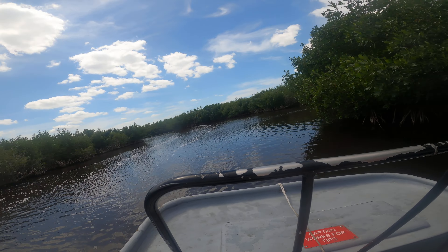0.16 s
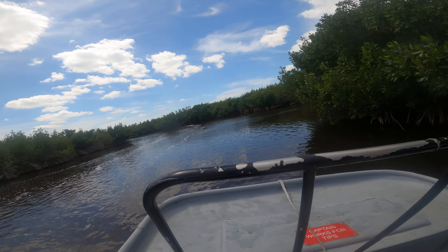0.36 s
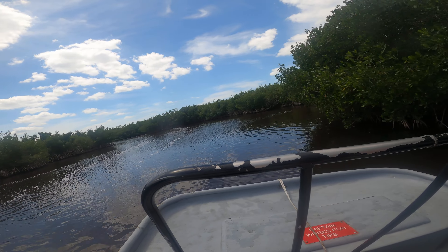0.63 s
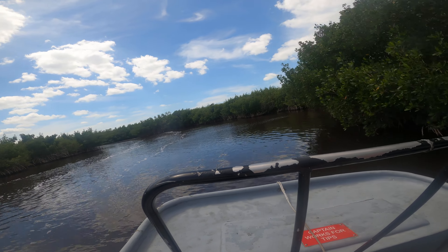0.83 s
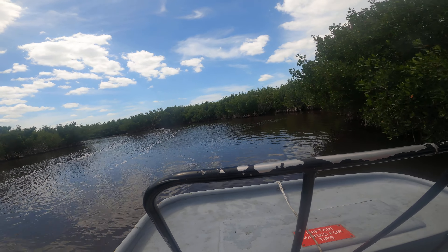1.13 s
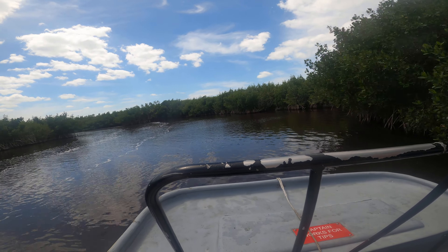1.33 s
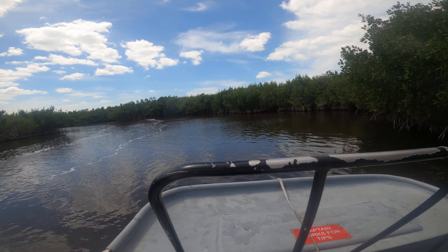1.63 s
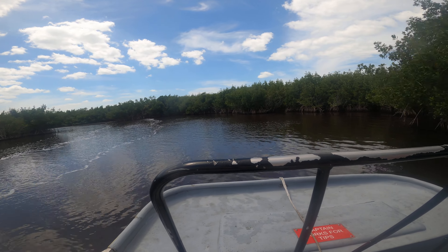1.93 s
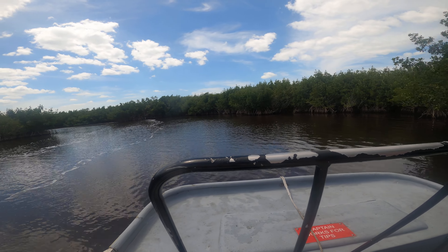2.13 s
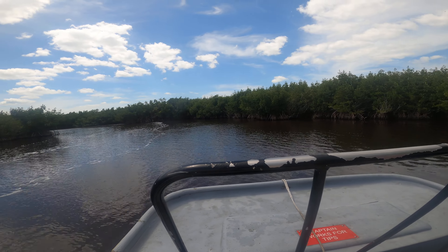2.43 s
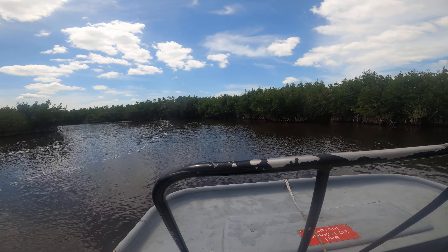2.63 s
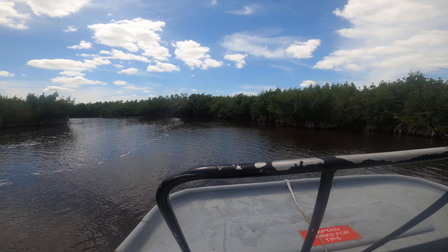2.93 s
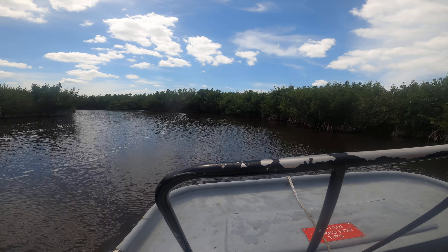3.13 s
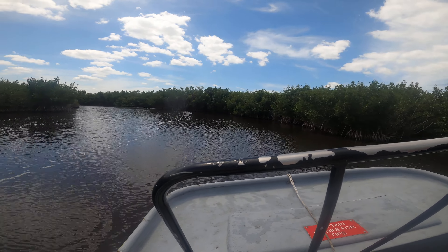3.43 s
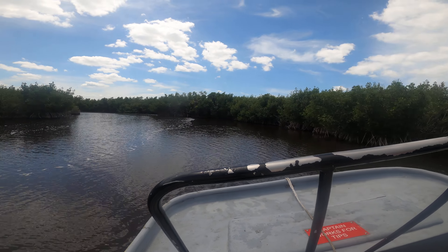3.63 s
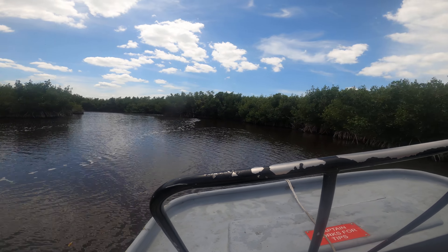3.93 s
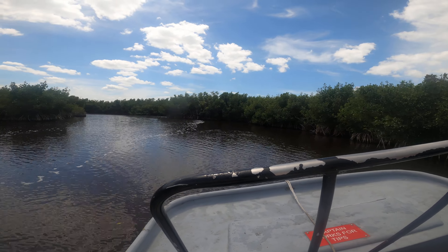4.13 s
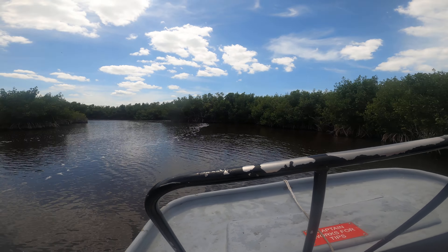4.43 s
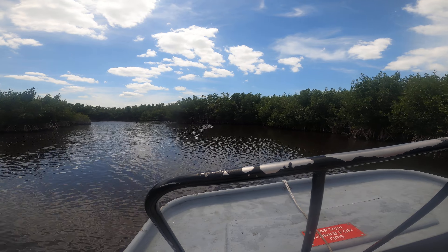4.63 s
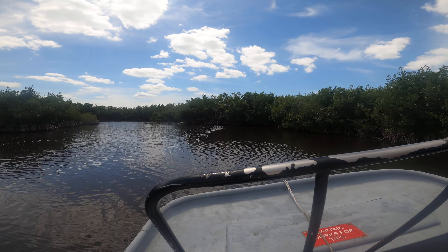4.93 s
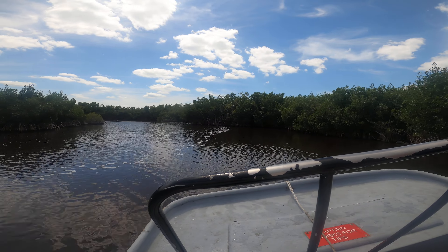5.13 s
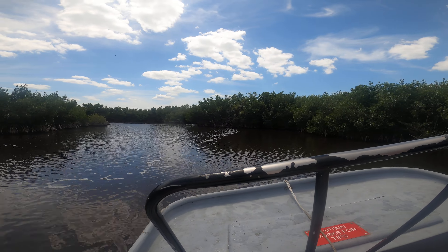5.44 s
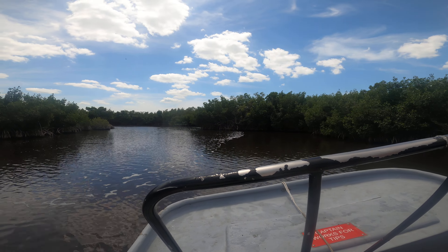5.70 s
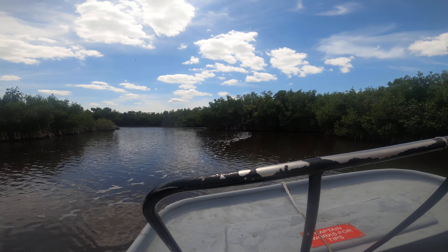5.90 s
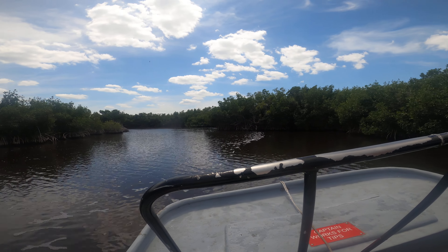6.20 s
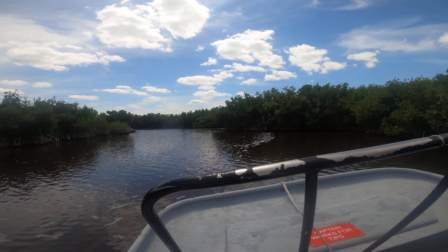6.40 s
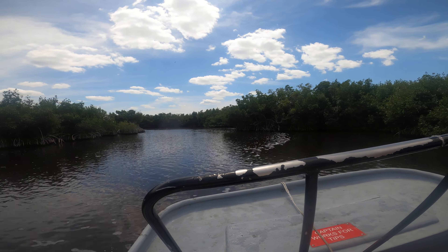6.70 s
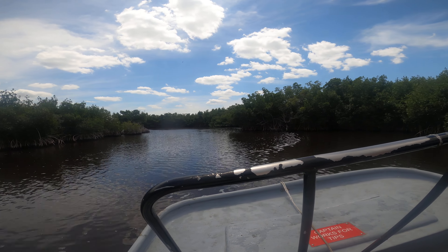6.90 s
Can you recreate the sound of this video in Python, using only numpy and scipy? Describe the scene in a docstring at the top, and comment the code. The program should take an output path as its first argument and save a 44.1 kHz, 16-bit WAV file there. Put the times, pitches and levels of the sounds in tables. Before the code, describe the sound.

An airboat under way, heard close in stereo from the bow, outdoors and dry. From 0 to 3 s the large engine and two-blade propeller cruise at full roar: a low, nearly steady drone edging slightly upward, a ragged buzz that swells and fades, uneven exhaust beats and dense throbbing air. Around 3.1 s the throttle is chopped; pitch and loudness tumble, the buzz vanishes, and by 4.1 s only a slow, deep chugging flutter remains, about a third of the cruising speed. From 4.1 to 4.75 s it revs up, with thin whistles climbing and hollow thumps of the hull at each blade pass. It sags back to a low chug by 5.35 s, then opens again with more whistles, reaching a firm growl by 6 s. It holds, thumping and roughly pulsing, and whistles rise again near 6.8 s as it strengthens slightly to the end at 7 s.

```python
"""An airboat under way, heard from the bow: a V8 drives a two-blade propeller at half crank speed.
It first cruises with steady blade tones, a ragged buzz, uneven exhaust beats and roaring, throbbing air.
At 3 s the throttle is chopped and the pitch falls; then it is blipped, eased and opened again.
At these low speeds each blade pass thumps the hull, and thin whistles climb as the throttle opens.
The tones are sums of sine waves locked to the shaft; the air is filtered noise. Two microphone ports hear it."""
import sys
import numpy as np
from scipy import signal
from scipy.fft import rfft, irfft, next_fast_len
from scipy.io import wavfile
from scipy.ndimage import uniform_filter1d

SR = 44100
rng = np.random.default_rng(int(sys.argv[2]) if len(sys.argv) > 2 else 0)


def inscribe(sig):
    """Save sig as 16-bit PCM at rate SR to the path in sys.argv[1].

    A 1-D sig is mono; a 2-D sig holds one channel per row.
    Samples are clipped to [-1, 1] before scaling.
    """
    pcm = np.round(np.clip(np.atleast_2d(sig).T, -1, 1) * 32767)
    wavfile.write(sys.argv[1], SR, pcm.astype(np.int16))


N = 311327
LONG = next_fast_len(N + SR // 4)   # samples in each spectrum, with spare room at the end
STEP = 8   # engine tones lie low, so they are built on every 8th sample
CRUISE_HZ = 41.2   # shaft turns per second at cruise


def amp(db):
    """Turn decibels into a gain."""
    return 10 ** (np.asarray(db) / 20)


def in_time(rows):
    """Read the columns of a table at every sample."""
    start_s, *columns = np.transpose(rows)
    return [np.interp(np.arange(N) / SR, start_s, column) for column in columns]


def at_hz(points, hz):
    """Read a spectrum on a log-frequency axis."""
    points = np.array(points, float)
    return np.interp(np.log(hz + 1), np.log(points[:, 0] + 1), points[:, 1])


def drift(rate_hz, count=N):
    """Slow random wandering of spread 1 over the whole scene, made on every 64th sample."""
    pole = np.exp(-2 * np.pi * rate_hz * 64 / SR)
    noise = rng.standard_normal(N // 64 + 1500)
    slow = signal.lfilter([1], [1, -2 * pole, pole ** 2], noise)[1500:]
    places = np.linspace(0, len(slow) - 1, count)
    return np.interp(places, np.arange(len(slow)), slow / slow.std())


def tone(level_db, turn, order, flutter_db, wander_rad, rate_hz, lag=0):
    """One order (whole number of waves per shaft turn); turbulence shakes its level and phase."""
    count = len(turn)
    gain = np.sqrt(2) * amp(level_db + flutter_db * drift(rate_hz, count))
    return -gain * np.sin(order * turn - lag + wander_rad * drift(rate_hz, count))


# how fast the blades go by: start_s, blade_hz (passes per second)
BLADE_SPEED = [(0, 80.6), (.2, 81.4), (.44, 81.9), (1.2, 82.35), (2.3, 82.65), (2.95, 82.0), (3.08, 79),
               (3.19, 65.8), (3.31, 57.4), (3.52, 45.17), (3.84, 33.7), (4.09, 28), (4.3, 37.4),
               (4.5, 43.9), (4.73, 47.8), (4.79, 47.4), (5.02, 37.3), (5.33, 28.45), (5.42, 29.4),
               (5.78, 40.4), (6.03, 44.4), (6.42, 46.4), (6.88, 47.1), (7.06, 50)]
# how hard the engine pulls: start_s, effort_db (against full effort)
ENGINE_EFFORT = [(0, 2.5), (1.0, 2), (2.85, 1.5), (3.08, -1), (3.18, -7), (3.3, -10), (3.5, -15.5),
                 (3.92, -22.5), (4.15, -17), (4.4, -7), (4.72, -2), (5.0, -9), (5.33, -15.5), (5.45, -11),
                 (5.6, -6), (5.75, -3.5), (6.0, -3), (6.3, -3.5), (6.9, -1.5), (7.06, -1)]
# engine tones, throttle open: blade_hz, then level_db at full effort, before unsteadiness,
# of blade tones 1, 2, 3 and of exhaust orders 3, 5, 8, 10, 11
OPEN_THROTTLE = [(28.6, -9, -32, -25, -15, -29, -23, -26, -31.5),
                 (32, -14, -22, -37, -29, -38.0, -19.5, -25.5, -41),
                 (37, -15, -33, -26, -16.5, -39, -22, -29, -14),
                 (39.5, -10.5, -32.5, -23.5, -35, -25, -17.5, -29, -32.5),
                 (42.3, -11.5, -24, -35, -36, -24.0, -21, -25, -24.5),
                 (44.2, -18, -23, -33, -37, -22, -26, -41, -24.5),
                 (44.6, -12, -22, -33, -38, -21.5, -22, -40, -25.5),
                 (47.1, -20, -21.5, -28, -45, -20, -23.5, -26, -38),
                 (47, -19, -24, -23, -47, -21.5, -19.5, -31.5, -42),
                 (51, -30, -19.5, -40, -40.5, -18, -23.5, -21, -30.5),
                 (82.4, -14.0, -18.5, -20.0, -38.0, -36.5, -32.5, -38, -58.5)]
# the same columns with the throttle shut
SHUT_THROTTLE = [(28.7, -15, -24, -23.5, -17, -28, -28, -31, -40),
                 (32, -11.5, -24, -24, -20.5, -34, -32, -36, -23),
                 (35, -7, -24, -27, -37, -42, -46, -21.5, -22),
                 (39.7, -11.0, -29.0, -24, -24, -30, -30.5, -27, -52),
                 (46.4, -13.0, -20, -22, -41, -22.5, -30, -33, -35),
                 (45.8, -24, -20, -35, -29.0, -19.5, -27.5, -36, -36.5),
                 (51, -15.5, -18, -46, -32, -22, -26, -33, -35),
                 (58.8, -8, -27, -17.5, -39.5, -45, -29, -39.5, -39),
                 (65.7, -10, -20, -24.5, -34, -40, -28, -30.5, -49),
                 (72.4, -11, -44, -20, -36, -50.5, -34, -31.5, -64),
                 (79.7, -13, -18.5, -20, -39.0, -32, -30.5, -44, -56.0)]
# for each of those eight tones: dB lost per dB of lost effort
TONE_FOLLOWS_EFFORT = [0.78, 0.29, .6, 0.57, 0.57, 0.82, 0.88, 1]


def controls():
    """Blade speed and engine effort set the levels of the engine tones and the moving air."""
    (blade_hz,), (effort_db,) = in_time(BLADE_SPEED), in_time(ENGINE_EFFORT)
    slack_db = np.minimum(effort_db, 0)
    # the throttle counts as fully shut when the blade rate falls by 16 Hz per second or faster
    fall_hz_per_s = -np.gradient(blade_hz) * SR
    shut = uniform_filter1d(np.clip(fall_hz_per_s / 16, 0, 1), size=2000)
    cruising = np.clip((blade_hz / 2 / CRUISE_HZ - .9) / 0.028, 0, 1)
    open_hz, *open_levels = np.transpose(OPEN_THROTTLE)
    shut_hz, *shut_levels = np.transpose(SHUT_THROTTLE)
    tone_db = []
    for open_db, shut_db, share in zip(open_levels, shut_levels, TONE_FOLLOWS_EFFORT):
        pull_db = (1 - shut) * np.interp(blade_hz, open_hz, open_db)
        coast_db = shut * np.interp(blade_hz, shut_hz, shut_db)
        # the tones grow less steady as effort is lost
        tone_db.append(pull_db + coast_db + slack_db * (share + 0.07 * drift(8.4)))
    # each level: dB at full effort, dB per dB of effort, then changes at cruise or with throttle shut
    upper_db = -39.5 + 0.8 * effort_db - 3 * cruising - 1.5 * shut
    rumble_db = -31 + 0.096 * effort_db - 27 * cruising
    growl_db = -28.5 + 0.79 * effort_db - 5 * cruising
    roar_db = -27 + 0.93 * effort_db - 3.5 * cruising
    hiss_db = -34.5 + 0.79 * effort_db
    return blade_hz / 2, tone_db, upper_db, (rumble_db, growl_db, roar_db, hiss_db)


# blade buzz: order (waves per shaft turn), level_db (before speed, swell and flutter)
BLADE_BUZZ = [(9, -30.5), (10, -21.5), (11, -41.5), (12, -14), (13, -36.5), (14, -18.5), (15, -38.5),
              (16, -16), (17, -43.5), (18, -25.5), (19, -25), (20, -19.5), (21, -36.5), (22, -20.5),
              (23, -34), (24, -26.5), (25, -24), (26, -19.5), (27, -24.5), (28, -16), (29, -30.5),
              (30, -21), (32, -33), (34, -29), (36, -35.5), (38, -26), (40, -27.5), (48, -34.5)]
# the buzz swells and fades: start_s, low_part_db, high_part_db
BUZZ_SWELLS = [(0, -1, 4), (.55, -13.5, 5), (.68, 5, 3.5), (.95, 3, -3), (1.07, -8, 1), (1.25, 2.5, -1.5),
               (1.5, -4, 2), (1.65, 3, -0.5), (1.9, -9, 2), (2.12, 0.5, 0), (2.25, 4.5, 0),
               (2.45, -20, -0.5), (2.65, 6.5, 0.5), (2.85, 3.5, -1), (3.0, -1, 3)]


def propeller(turn, shaft_hz, low_db):
    """Each blade pass is a slow rise and a sharp drop; the ragged buzz above dies fast as tip speed falls."""
    # two paths cancel the lowest blade tone at 47.5 Hz; below that it arrives inverted
    first_lag = np.arctan((2 * shaft_hz - 47.5) / 2.0) - np.pi / 2
    out = 0
    for order, level_db, lag in zip((2, 4, 6), low_db, (first_lag, 0, 0)):
        out += tone(level_db, turn, order, flutter_db=.5, wander_rad=.04, rate_hz=9.5, lag=lag)
    tip_db = -19 + 170 * np.log10(shaft_hz / CRUISE_HZ)
    low_part_db, high_part_db = [column[::STEP] for column in in_time(BUZZ_SWELLS)]
    for order, db in BLADE_BUZZ:
        cruise_pitch_hz = order * CRUISE_HZ
        level_db = tip_db + db
        if cruise_pitch_hz > 1000:
            level_db = level_db + high_part_db
        if cruise_pitch_hz < 550:
            level_db = level_db + low_part_db
        lag = rng.uniform(0, 2 * np.pi)
        out += tone(level_db, turn, order, flutter_db=4.2, wander_rad=.55, rate_hz=4.0, lag=lag)
    return out


# tone colour of the weaker exhaust orders: pitch_hz, level_db (relative)
EXHAUST_COLOUR = [(15, -4.5), (25, -7), (40, 1), (130, 5), (195, 10.5), (232, 9.5), (258, 5.5), (290, -1.5),
                  (400, -6), (600, -11.5)]
# weaker exhaust orders: order (waves per shaft turn), level_db (relative)
WEAKER_EXHAUST = [(1, -5), (7, -8.5), (9, -21.5), (12, -20.5), (13, 3.5), (14, -19), (15, -8.5), (16, 2.5),
                  (17, -7.5), (18, -10.5), (19, 0.5), (20, -14), (21, 3.5)]


def exhaust(turn, shaft_hz, low_db, upper_db):
    """Eight firings per shaft turn; the near bank fires unevenly, which feeds orders 3 and 5 of every 8."""
    near_bank = np.array([1, 0, 0, 1, 0, 1, 1, 0])
    far_share = .2   # loudness of the farther cylinder bank against the near one
    lags = np.angle(np.fft.fft(near_bank + far_share * (1 - near_bank)))
    late = turn - 1.42   # the beats arrive behind the blades (radians of shaft)
    out = 0
    for order, level_db in zip((3, 5, 8, 10, 11), low_db):
        out += tone(level_db, late, order, flutter_db=1.5, wander_rad=0.078, rate_hz=5.5, lag=lags[order % 8])
    for order, db in WEAKER_EXHAUST:
        level_db = upper_db + db + at_hz(EXHAUST_COLOUR, order * shaft_hz)
        if order in (12, 14):
            # blade passes strengthen these by up to 13 dB below cruise speed
            level_db = level_db + 13 * np.clip(2 - 2 * shaft_hz / CRUISE_HZ, 0, 1)
        out += tone(level_db, late, order, flutter_db=2.5, wander_rad=0.25, rate_hz=4.0, lag=lags[order % 8])
    return out


# colour of the moving air: pitch_hz, level_db (per Hz, relative within each range)
AIR_COLOUR = [(15, -8.5), (40, 3.5), (120, 3.5), (250, -4.5), (330, -11), (500, -3.5), (900, -11),
              (1000, -18), (1300, -12.5), (1700, -15.5), (3500, -25), (6500, -32), (8000, -41),
              (11000, -56), (16000, -72)]
# ringing of the microphone housing, added to the air: pitch_hz, width_hz, boost_db
HOUSING_RINGS = [(647, 130, -1), (1131.5, 217, 16.5), (2000, 91, 6), (3240, 280, 3.5), (4630, 160, 3)]
# noise common to both ports: pitch_hz, share (0 to 1)
SHARED_NOISE = [(50, 1), (300, 0.94), (600, 0.89), (1200, 0.87), (2000, 0.58), (4000, 0.55), (8000, 0.098),
                (12000, 0.76)]
# the air pulses with the blades: pitch_hz, once_per_pass_db, twice_per_pass_db (before patchiness scaling)
BLADE_THROB = [(100, .6, 0), (600, 2.2, .6), (1150, 1.4, 2.2), (1800, 1.1, 1.2), (3000, .5, .5),
               (5000, .2, .2)]


def wash(turn, rumble_db, growl_db, roar_db, hiss_db):
    """Turbulent air off the blades: four ranges on their own levels, patchy by band, throbbing with the passes."""
    hz = np.fft.rfftfreq(LONG, 1 / SR)
    colour_db = at_hz(AIR_COLOUR, hz)
    for ring_hz, width_hz, boost_db in HOUSING_RINGS:
        colour_db = colour_db + boost_db / (1 + (2 * (hz - ring_hz) / width_hz) ** 2)
    shared = np.clip(at_hz(SHARED_NOISE, hz), 0, 1)
    common, left, right = rfft(rng.standard_normal((3, LONG)))
    separate = np.array([left, right])
    noise = amp(colour_db) * (np.sqrt(shared) * common + np.sqrt(1 - shared) * separate)
    gust = drift(5.7)
    # the swells come at set phases around each pass (radians)
    once, twice = np.cos(2 * turn - 0.8), np.cos(4 * turn + 1.3)
    throb_hz, once_db, twice_db = np.transpose(BLADE_THROB)
    # low_hz, high_hz, number of bands, level_db, patchy_db
    ranges = [(15, 230, 3, rumble_db, 1.3), (230, 720, 4, growl_db, 1.9),
              (720, 1500, 3, roar_db, 0.8), (1500, 17000, 5, hiss_db, 0.48)]
    out = 0
    for low_hz, high_hz, count, level_db, patchy_db in ranges:
        edges = np.geomspace(low_hz, high_hz, count + 1)
        bands = 0
        for bottom, top in zip(edges, edges[1:]):
            patches_db = patchy_db * (0.073 * gust + drift(9.7))
            throb_db = np.interp(bottom, throb_hz, once_db) * once + np.interp(bottom, throb_hz, twice_db) * twice
            band = irfft(noise * ((hz >= bottom) & (hz < top)), LONG)[:, :N]
            bands = bands + amp(patches_db + throb_db) * band
        out = out + amp(level_db) * bands / bands.std()
    return out


# strength of the hull thump: start_s, level_db (a tone at the resonance sits 11 dB lower, before flutter)
HULL_THUMP = [(3.0, -64), (3.15, -28), (3.42, -34), (3.6, -48), (4.1, -53), (4.36, -37), (4.47, -31),
              (4.52, -22), (4.7, -21.5), (4.75, -33), (4.84, -26), (4.97, -28), (5.03, -40), (5.4, -45),
              (5.8, -33), (6.27, -32), (6.34, -24), (6.8, -24.5), (6.9, -28), (7.0, -25)]


def thump(turn, shaft_hz):
    """Each pressure pulse sets the hull panel ringing: even orders in step under one resonance."""
    panel_hz, panel_width_hz = 585, 210
    level_db = in_time(HULL_THUMP)[0][::STEP]
    shaken = turn + 0.0045 * drift(2.5, len(turn))
    out = 0
    for order in range(10, 46, 2):
        detune = 2 * (order * shaft_hz - panel_hz) / panel_width_hz
        ring_db = level_db - 11.0 - 20 * np.log10(1 + detune ** 2)
        lag = 2 * np.arctan(detune)   # lets the panel ring on after the blow
        out += tone(ring_db, shaken, order, flutter_db=1.2, wander_rad=.13, rate_hz=8.0, lag=lag)
    return out


# whistles as the throttle opens: start_s, end_s, start_pitch_hz, end_pitch_hz, level_db
# (pitches before wavering, level before flutter and the fades at both ends)
RISING_WHISTLES = [(4.1, 4.16, 1830, 1880, -51), (4.12, 4.45, 1950, 2050, -49),
                   (4.13, 4.3, 1660, 1830, -49), (4.3, 4.6, 2120, 2520, -49), (5.38, 5.63, 1600, 1810, -47),
                   (5.45, 5.73, 1780, 2110, -46), (5.49, 5.66, 1960, 2050, -47),
                   (5.57, 5.78, 2780, 2900, -49), (5.59, 5.77, 2270, 2630, -45),
                   (5.59, 5.67, 2530, 2760, -49), (5.64, 5.74, 2180, 2300, -47),
                   (6.77, 6.86, 2740, 2830, -51), (6.78, 6.92, 2480, 2770, -45),
                   (6.82, 6.97, 2320, 2530, -44), (5.6, 5.8, 1750, 1950, -47),
                   (6.95, 7.05, 2650, 2800, -53)]


def whistles():
    """Thin wavering tones that climb quickly, then level off."""
    out = np.zeros(N)
    for start_s, end_s, start_hz, end_hz, level_db in RISING_WHISTLES:
        span = slice(round(start_s * SR), round(end_s * SR))
        way = np.linspace(0, 1, span.stop - span.start)
        climb = 1 - (1 - way) ** 1.4
        hz = start_hz + (end_hz - start_hz) * climb + 14 * drift(35.0)[span]
        gain = np.sqrt(2) * amp(level_db + 2 * drift(35.0)[span])
        swell = np.sin(np.pi * way) ** .5
        out[span] += gain * swell * np.sin(2 * np.pi * np.cumsum(hz) / SR)
    return out


def engine(turn, shaft_hz, tone_db, upper_db):
    """All tones tied to the shaft, built at a low sample rate and then brought up to the full one."""
    turn, shaft_hz, upper_db = turn[::STEP], shaft_hz[::STEP], upper_db[::STEP]
    tone_db = [level[::STEP] for level in tone_db]
    tones = propeller(turn, shaft_hz, tone_db[:3])
    tones = tones + exhaust(turn, shaft_hz, tone_db[3:], upper_db)
    tones = tones + thump(turn, shaft_hz)
    return signal.resample_poly(tones, STEP, 1, window=("kaiser", 12))[:N]


# balance of the bass, which leans left after the chop: start_s, left_minus_right_db
BASS_LEAN = [(3.0, -1.0), (3.3, 1.5)]
# balance above the bass: pitch_hz, left_minus_right_db
PORT_BALANCE = [(300, -3.5), (530, 2), (810, 5), (1250, 6.5), (1940, 2), (2990, 9), (4620, 0), (7130, -3),
                (9000, 4), (12000, -4)]
# how far left leads right, before fading in the bass and top: pitch_hz, lead_rad (first row is not used)
PORT_LEAD = [(0, 0), (860, 0.3), (1380, -0.2), (1890, -1.6), (2670, -1.4), (3360, -0.6), (3620, -1.7),
             (4650, 0.4), (5000, -0.1), (5250, 0.2), (5860, -1.1), (6290, 1.9), (6720, 2.0), (7320, 3.4)]


def two_ports(air):
    """The two ports sit apart in the housing: each hears its own colour and lag."""
    hz = np.fft.rfftfreq(LONG, 1 / SR)
    side = np.array([[.5], [-.5]])   # left, right
    bass = 1 / (1 + (hz / 450) ** 2)
    lead_rad = at_hz(PORT_LEAD[1:], hz) * (1 - bass) / (1 + (hz / 9000) ** 8)
    ports = rfft(air, LONG) * np.exp(1j * side * lead_rad)
    low = irfft(ports * bass, LONG)[:, :N]
    treble = irfft(ports * (1 - bass) * amp(side * at_hz(PORT_BALANCE, hz)), LONG)[:, :N]
    bass_lean_db, = in_time(BASS_LEAN)
    return amp(side * bass_lean_db) * low + treble


def scene():
    """Propeller, exhaust, air and hull all follow one shaft; the whistles keep their own times."""
    shaft_hz, tone_db, upper_db, wash_db = controls()
    turn = 2 * np.pi * np.cumsum(shaft_hz) / SR   # shaft angle in radians
    air = engine(turn, shaft_hz, tone_db, upper_db) + wash(turn, *wash_db) + whistles()
    return two_ports(air)


def record(dry):
    """The microphone loses the deepest bass, below 20 Hz; the top is cut from 15.7 kHz up."""
    dry = signal.lfilter(*signal.butter(1, 20, "high", fs=SR), dry)
    return signal.sosfilt(signal.cheby2(12, 70, 15700, fs=SR, output="sos"), dry)


dry = scene()
out = record(dry)
inscribe(out)
```